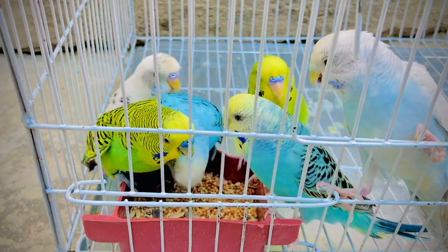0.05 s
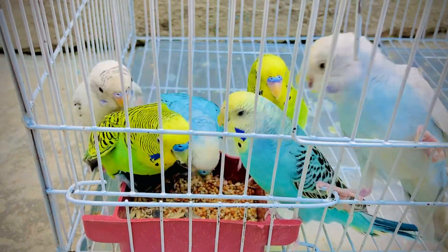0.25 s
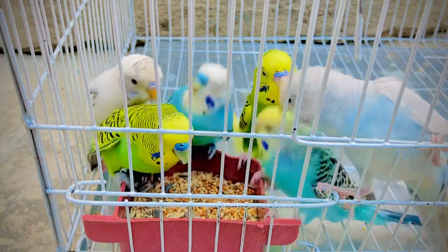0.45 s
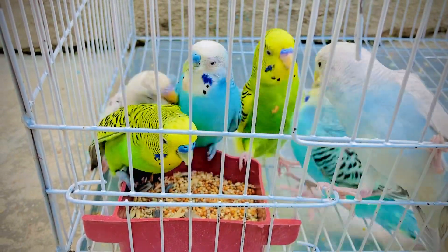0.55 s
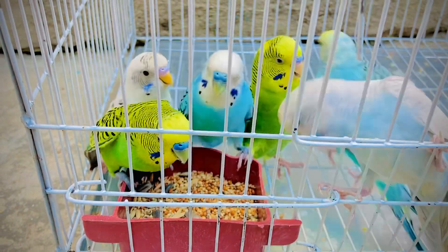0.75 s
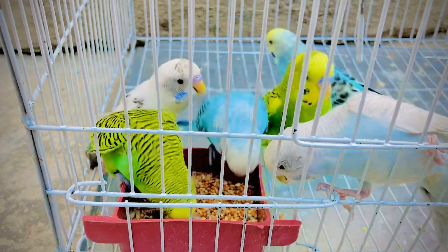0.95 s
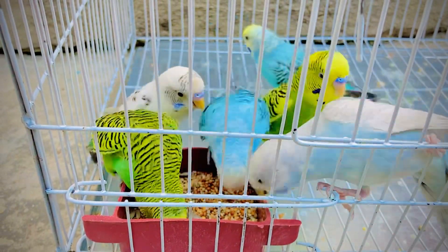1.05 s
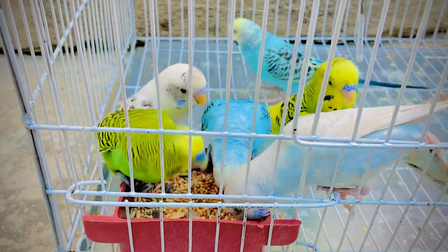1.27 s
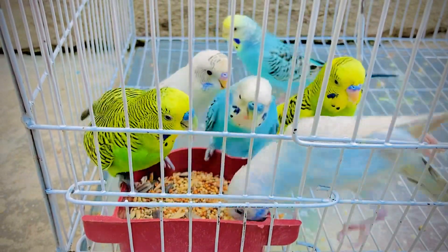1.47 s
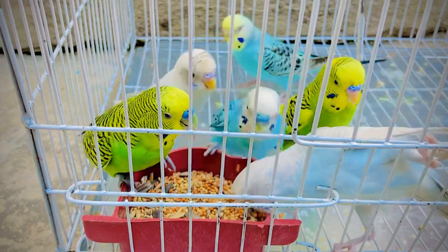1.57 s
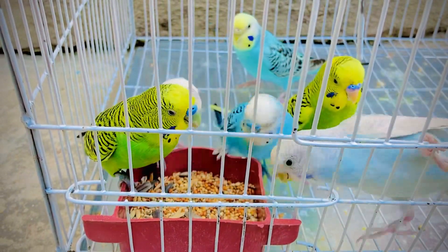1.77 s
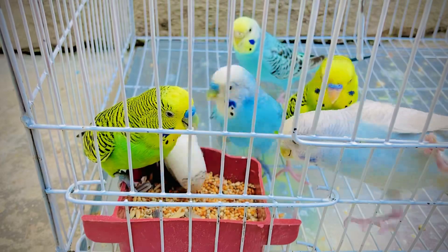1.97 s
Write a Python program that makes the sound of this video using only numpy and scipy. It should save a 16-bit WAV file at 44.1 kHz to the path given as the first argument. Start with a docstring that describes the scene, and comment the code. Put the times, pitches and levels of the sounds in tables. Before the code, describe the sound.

Budgerigars chatter close by in a lightly reverberant room. An earlier chirp's tail dies at once, with small seed clicks until 0.16 seconds and a weak chirp at 0.1. From 0.23 short, raspy, rising-and-falling chirps run steadily, with a sharper seed click near 0.58. They crowd and overlap around 1.2-1.45, then space out; another click at 1.86 and a strong harsh chirp at 1.93. Faint rumble and hiss persist.

```python
"""A low rumble and faint hiss open the scene, and the reverberant tail of an earlier chirp dies away.
Seed clicks, as decaying noise bursts, come mostly early and now and then among the chirps of
budgerigars squabbling at a seed dish in a wire cage. Each chirp is a short arch of pitch built from
harmonics, some hoarse, through a fixed throat response. The room answers with early and late
reverberation. A handheld camera close by, indoors, hears it through two ports unlike in phase and colour."""
import sys
import numpy as np
from scipy import signal
from scipy.fft import rfft, irfft, next_fast_len
from scipy.io import wavfile
from scipy.ndimage import map_coordinates

SR = 44100
rng = np.random.default_rng(int(sys.argv[2]) if len(sys.argv) > 2 else 0)


def persist_wave(psi):
    """Save psi, clipped to +-1, as 16-bit WAV."""
    counts = np.round(np.clip(psi, -1, 1) * 32767).astype(np.int16)
    wavfile.write(sys.argv[1], SR, np.atleast_2d(counts).T)


N = 88861
TOP_HZ = 17150  # upper band limit


def amp(db):
    """Level to amplitude: 20 dB is a factor of ten."""
    return 10 ** (np.asarray(db) / 20)


def unit(x):
    """Normalization to an rms value of one."""
    return x / np.sqrt(np.mean(x ** 2) + 1e-20)


def along(points, hz):
    """Linear interpolation of (f/Hz, value) points over log frequency."""
    f, v = np.transpose(points)
    return np.interp(np.log(hz + 1), np.log(f + 1), v)


def wobble(rate_hz):
    """Band-limited random modulation: a smooth curve through rate_hz random values a second."""
    return map_coordinates(rng.standard_normal(N // 2), [np.arange(N) * rate_hz / SR])


def filtered(x, response):
    """Linear filtering: the spectrum times a frequency response."""
    m = next_fast_len(N + SR // 2)
    return irfft(rfft(x, m) * response(np.fft.rfftfreq(m, 1 / SR)), m)[..., :N]


def coloured(x, points):
    """Spectral shaping by (f/Hz, gain/dB) points, falling away below the lowest."""
    return filtered(x, lambda hz: amp(along([(1, -120)] + list(points), hz)))


# Relative spectrum of the rumble: f/Hz, spectral level/dB
RUMBLE_SPECTRUM = [(25, -21), (50, 6), (100, -4.5), (250, -4.5), (450, -15), (1500, -28)]
# Slow drift of the rumble: t/s, level/dB before the microphone
RUMBLE_DRIFT = [(0.0, -60.5), (1.17, -62), (2.01, -59.5)]
# Relative spectrum of the hiss: f/Hz, spectral level/dB
HISS_SPECTRUM = [(500, 1.5), (900, 6.5), (1400, 6), (3000, -8.5), (15000, -3.5)]
RUMBLE_SIDE_DB, HISS_DB = -13, -55.5  # side signal re mid; hiss before the microphone


def floor():
    """Correlation of noise: rumble is nearly equal at both ports, hiss is independent at each."""
    mid, side = coloured(rng.standard_normal((2, N)), RUMBLE_SPECTRUM) * amp([[0], [RUMBLE_SIDE_DB]])
    rumble_db = np.interp(np.arange(N) / SR, *np.transpose(RUMBLE_DRIFT))
    rumble = unit(np.array([mid - side, mid + side])) * amp(rumble_db)
    hiss = unit(coloured(rng.standard_normal((2, N)), HISS_SPECTRUM))
    return rumble + amp(HISS_DB) * hiss


FADING_DB, FADING_HZ = -48.5, 2720  # level at t = 0 before the microphone; centre of the pitch band
FADING_DB_PER_S = 200


def fading():
    """Exponential reverberant decay: noise bands at an earlier chirp's pitch and second harmonic."""
    def bands(hz):
        return sum(np.exp(-((hz / k - FADING_HZ) / 400) ** 2) for k in (1, 2))

    tail = unit(filtered(rng.standard_normal((2, N)), bands))
    return tail * amp(FADING_DB - FADING_DB_PER_S * np.arange(N) / SR)


# Clicks: t/s, initial level of the bright part/dB before colouring, dull part re bright/dB
SEED_CLICKS = [(0.0611, -53, 5), (0.065, -51, -7), (0.1261, -50.5, -31), (0.156, -53.5, -29),
               (0.5792, -38.5, 7), (0.604, -73.5, 46), (1.8558, -41.5, -1)]
# Colour of the bright part, a cracking husk: f/Hz, gain/dB
HUSK_COLOUR = [(2500, -18), (6000, 15.5), (15500, 33)]
# Colour of the dull part, a tapped dish: f/Hz, gain/dB
DISH_COLOUR = [(700, -44), (1500, 15), (6000, -7.5)]
CLICK_T60_S, DULL_T60_S = .005, .015


def clicks():
    """Impulsive excitation: seed husks crack as short bright noise, with more or less dull dish tap."""
    bright, dull = np.zeros(N + SR), np.zeros(N + SR)
    t = np.arange(SR // 20) / SR
    for start, level_db, dull_db in SEED_CLICKS:
        crack, tap = rng.standard_normal((2, len(t)))
        i = round(start * SR)
        span = slice(i, i + len(t))
        bright[span] += amp(level_db) * 1000 ** (-t / CLICK_T60_S) * crack
        dull[span] += amp(level_db + dull_db) * 1000 ** (-t / DULL_T60_S) * tap
    return coloured(bright[:N], HUSK_COLOUR) + coloured(dull[:N], DISH_COLOUR)


# Reverberation time of the room tail: f/Hz, t60/s
ROOM_T60 = [(1500, .16), (3000, .33), (4500, .2)]
ROOM_DB, GAP_S = -17, 0.0028  # energy of the tail response at the left; delay of the whole answer
NEAR_DB, NEAR_T60_S = -14, .05  # quick answers from cage and near wall


def room(x):
    """Convolution with decaying noise: quick cage and wall answers plus a tail that dies by band."""
    out, block, size = np.zeros((2, N + SR)), SR // 10, SR // 2
    # the room answer is redrawn every tenth of a second, so its random tail varies
    for i in np.arange(0, N, block):
        hz, t, z = signal.stft(rng.standard_normal((2, size)), SR, nperseg=256)
        decay = 1000 ** (-t / along(ROOM_T60, hz)[:, None])
        tail = signal.istft(z * decay, SR, nperseg=256)[1][:, :size]
        near = rng.standard_normal(tail.shape) * 1000 ** (-np.arange(size) / SR / NEAR_T60_S)
        answer = amp(ROOM_DB) * tail / np.linalg.norm(tail[0])
        answer += amp(NEAR_DB) * near / np.linalg.norm(near[0])
        wet = signal.fftconvolve(x[None, i:i + block], answer, axes=1)
        out[:, i + round(GAP_S * SR):][:, :wet.shape[1]] += wet
    return out[:, :N]


# Chirps: t/s, length/s (the release runs slightly past it), rising share (0-1, kept off the ends),
# first f/Hz, top f/Hz, last f/Hz, level at the top/dB before the throat,
# second harmonic re that level/dB, hoarseness (0-1, before the onset adds more)
CHIRP_ARCHES = [(0.107, 0.011, 0.45, 2180, 2041, 2030, -29, -10, 0),
                (0.229, 0.025, 0.68, 1633, 3020, 2240, -29, -7, 0.28),
                (0.307, 0.02, 0.56, 1715, 3127, 2520, -22, -1.5, 0.2),
                (0.392, 0.025, 0.46, 2580, 3323, 2030, -29.5, -5, 0),
                (0.455, 0.02, 0.61, 1020, 3375, 2600, -21, -7, 0.35),
                (0.475, 0.0036, 0.5, 1400, 1590, 1400, -40, -11, 0.1),
                (0.481, 0.003, 0.1, 1550, 1645, 1190, -23, -4, 0.23),
                (0.523, 0.024, 0.58, 1235, 3236, 2670, -21.5, 0, 0.22),
                (0.612, 0.026, 0.48, 2900, 2230, 1970, -31, -21, 0.2),
                (0.627, 0.013, 0.8, 1526, 2332, 2190, -29.5, 7.5, 0.3),
                (0.694, 0.011, 0.41, 1620, 2098, 1950, -29, -2.5, 0.13),
                (0.805, 0.028, 0.29, 1496, 2747, 2640, -25, 0, 0.29),
                (0.862, 0.018, 0.87, 1390, 2700, 2580, -29.5, -2.5, 0.2),
                (0.922, 0.03, 0.49, 1046, 3105, 2470, -26, 4, 0.25),
                (0.978, 0.016, 0.71, 1440, 2412, 2220, -31.5, 4.5, 0.18),
                (1.066, 0.02, 0.61, 1370, 2680, 2500, -33, 1, 0.34),
                (1.137, 0.028, 0.72, 1320, 2960, 2530, -24, 1, 0.23),
                (1.142, 0.015, 0.74, 2640, 3090, 3130, -25.5, -5, 0.24),
                (1.213, 0.021, 0.49, 1837, 2713, 2200, -27, 1.5, 0.14),
                (1.236, 0.033, 0.52, 970, 3357, 2820, -21, -11, 0.25),
                (1.295, 0.017, 0.78, 1560, 2395, 2250, -32.5, 5, 0.25),
                (1.341, 0.033, 0.5, 1233, 3427, 2710, -18, -13.5, 0.21),
                (1.37, 0.016, 0.42, 1820, 2607, 2140, -28.5, -2, 0.14),
                (1.411, 0.011, 0.93, 1280, 1967, 1900, -23.5, -36, 0.38),
                (1.417, 0.0325, 0.37, 2030, 3124, 2660, -28, -38, 0.29),
                (1.429, 0.0132, 0.64, 1430, 2282, 2130, -31, 0.5, 0.25),
                (1.444, 0.028, 0.5, 2900, 3045, 3030, -28.5, -40, 0.05),
                (1.504, 0.021, 0.55, 1780, 2810, 2040, -32.5, -2, 0.37),
                (1.563, 0.02, 0.5, 1450, 2175, 1940, -31.5, 1.5, 0.41),
                (1.625, 0.016, 0.95, 1220, 2427, 2430, -28.5, 5, 0.32),
                (1.629, 0.022, 0.42, 2356, 3003, 2980, -28.5, -1, 0.29),
                (1.753, 0.026, 1, 1086, 1912, 1880, -24.5, -0.5, 0.37),
                (1.77, 0.031, 0.36, 2250, 2940, 2990, -25, -7.5, 0.25),
                (1.858, 0.025, 0.55, 950, 2950, 2910, -22.5, -7, 0.11),
                (1.926, 0.014, 0.9, 1273, 1832, 1700, -14.5, -11, 0.2),
                (1.933, 0.023, 0, 2770, 2927, 2810, -24.5, -7.5, 0.2)]
# Response of the throat: f/Hz, gain/dB
THROAT_RESPONSE = [(700, -8), (1500, 4.5), (2200, -8), (3100, 2), (3800, 10), (5000, 8.5), (7000, -4),
                   (12500, -2.5)]
ATTACK_S, RELEASE_S = 0.0028, 0.0064
ARCH, SWELL_DB = 1.9, 9.5  # roundness (1 straight flanks, 2 a parabola); loss at the feet of the arch
THIRD_DB, OVERTONE_FALL_DB = -2, 5  # third harmonic re second; further loss for each higher one
PURIFY_DB = 14  # upper harmonics lose this over the falling flank
HALF_DB, HALF_GROWS_DB = -45, 66  # half-order tones: level when clear, gain per unit hoarseness
# per unit hoarseness: random values a second, depth in level, share of pitch
FLUTTER_HZ, FLUTTER_DB, WAVER = 450, 16, .1
GRIT_HZ, GRIT = 1200, .6  # random values a second; phase smear/rad per harmonic order and hoarseness
ROUGH_START, RASP_DB, RASP_S = .2, -8, .01  # onset: extra hoarseness, noise, their time constant


def chirps():
    """Source and filter: harmonics of an arching pitch, roughened by modulation, pass the throat."""
    voice, air = np.zeros(N + SR), rng.standard_normal(N)
    flutter = np.tanh([wobble(FLUTTER_HZ) for _ in range(4)])
    waver, grit = wobble(FLUTTER_HZ), wobble(GRIT_HZ)
    for start, length, rise, first, top, last, db, second_db, hoarse in CHIRP_ARCHES:
        i = round(start * SR)
        t = np.arange(round((length + RELEASE_S / 2) * SR)) / SR
        span = slice(i, i + len(t))
        u, rise = t / length, np.clip(rise, 1 / 20, 1 - 1 / 20)
        onset = np.exp(-t / RASP_S)
        hoarse = np.clip(hoarse, 0, 1) + ROUGH_START * onset

        # down is 0 at the top of the arch and 1 at its feet
        down = np.where(u < rise, 1 - u / rise, (u - rise) / (1 - rise)) ** ARCH
        foot_hz = np.where(u < rise, first, last)
        hz = (top - (top - foot_hz) * down) * (1 + WAVER * hoarse * waver[span])
        phase = 2 * np.pi * np.cumsum(hz) / SR
        edges = np.clip(np.minimum(t / ATTACK_S, (t[-1] - t) / RELEASE_S), 0, 1)
        shape = amp(db - SWELL_DB * down) * np.sin(np.pi / 2 * edges) ** 2

        strongest_db = max(0, second_db)
        upper_db = second_db - PURIFY_DB * down * (u > rise)
        half_db = strongest_db + HALF_DB + HALF_GROWS_DB * hoarse
        partials = [(1, 0.032), (2, upper_db)]  # order, level/dB
        partials += [(k + .5, half_db) for k in range(4)]
        partials += [(3 + k, upper_db + THIRD_DB - OVERTONE_FALL_DB * k) for k in range(6)]
        for j, (order, level_db) in enumerate(partials):
            level_db = level_db + FLUTTER_DB * hoarse * flutter[j % len(flutter), span]
            tone = np.sin(order * phase + GRIT * order * hoarse * grit[span])
            voice[span] += shape * amp(level_db) * tone * (order * hz < TOP_HZ)
        voice[span] += shape * amp(strongest_db + RASP_DB) * onset * air[span]
    return coloured(voice[:N], THROAT_RESPONSE)


# Phase lead of the left port for direct sound: f/Hz, phase/rad
PORT_LEAD = [(700, 0), (1500, 1.8), (2300, .6), (4000, 2.7), (5900, 3.6), (7400, 6.5), (8400, 3.6),
             (9500, 2.8), (11000, 0), (13000, -3), (15700, -6.3)]


def scene():
    """Superposition: near sounds reach the ports with a phase lead; all else is spread."""
    near = clicks() + chirps()
    direct = filtered(near, lambda hz: np.array([1 + 0 * hz, np.exp(-1j * along(PORT_LEAD, hz))]))
    return floor() + fading() + direct + room(near)


# Colour shared by both ports: f/Hz, gain/dB
MICROPHONE_RESPONSE = [(8000, 2), (9200, 2.5), (10500, -1), (13800, -5), (15600, -7.5), (17000, -30)]
# Left port over right: f/Hz, level difference/dB
PORT_DIFFERENCE = [(60, -3), (350, 0), (1300, 8), (2000, 6), (2600, .6)]


def record(dry):
    """Transducer response: the ports differ in colour, and nothing is kept above the band limit."""
    def ports(hz):
        right_loss_db = np.array([0 * hz, along(PORT_DIFFERENCE, hz)])
        return amp(along(MICROPHONE_RESPONSE, hz) - right_loss_db) * (hz < TOP_HZ)

    return filtered(dry, ports)


dry = scene()
out = record(dry)
persist_wave(out)
```